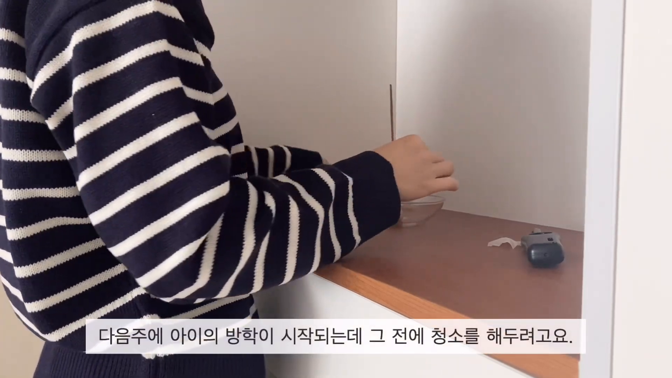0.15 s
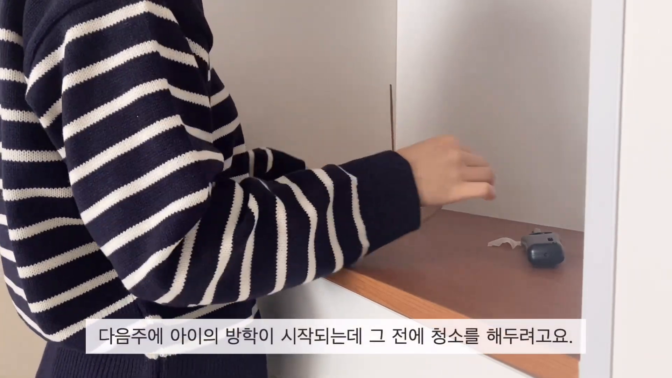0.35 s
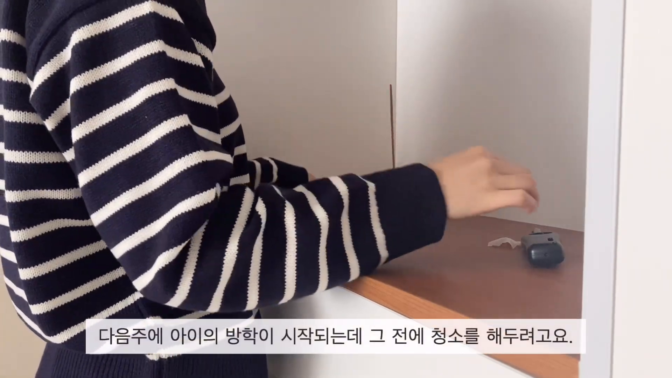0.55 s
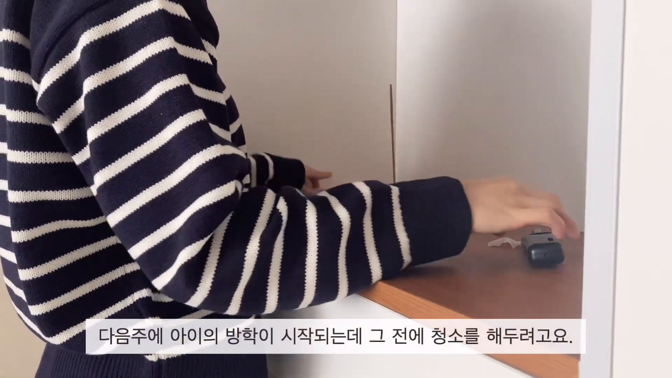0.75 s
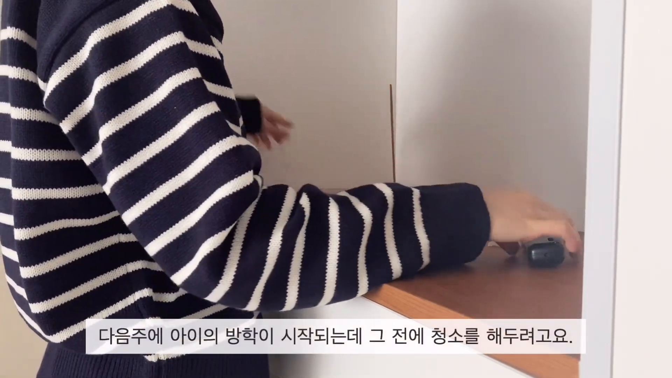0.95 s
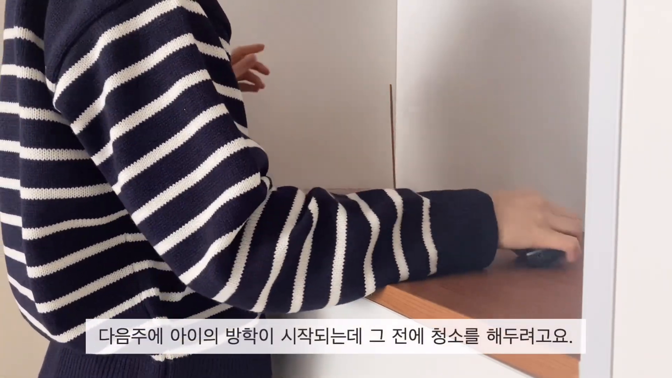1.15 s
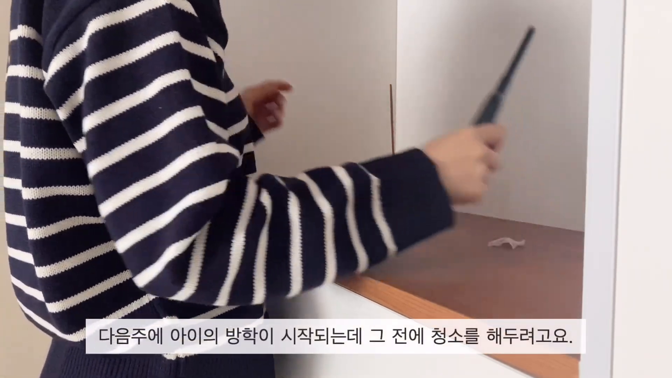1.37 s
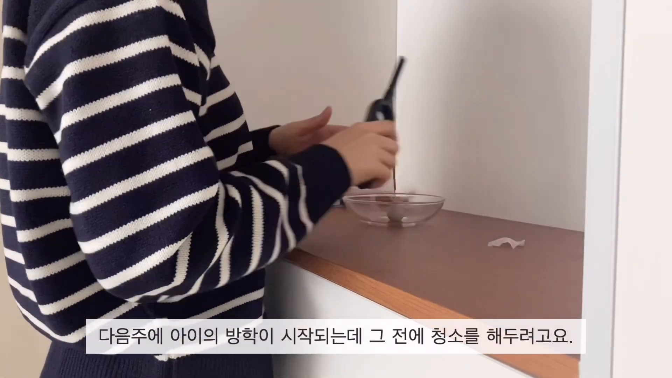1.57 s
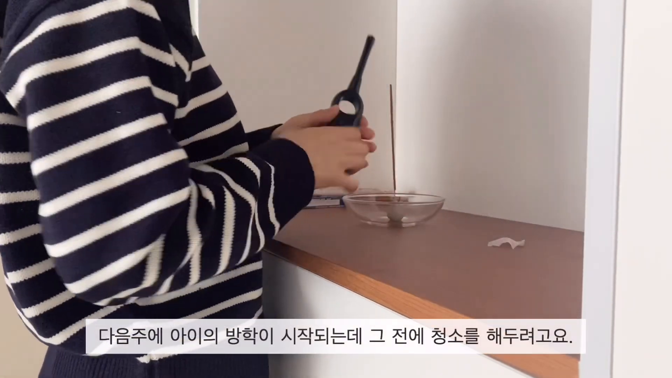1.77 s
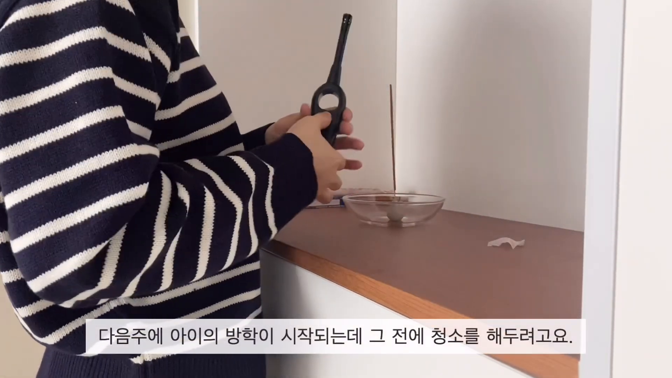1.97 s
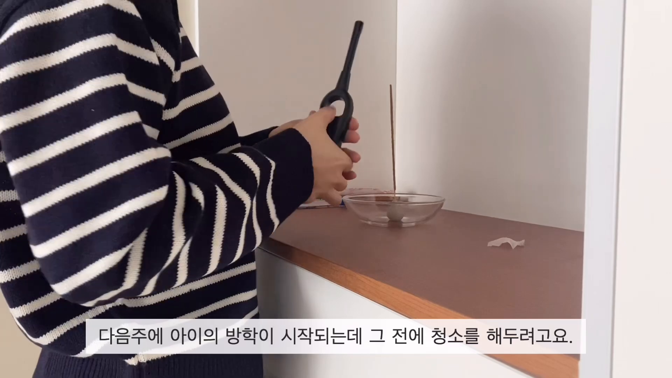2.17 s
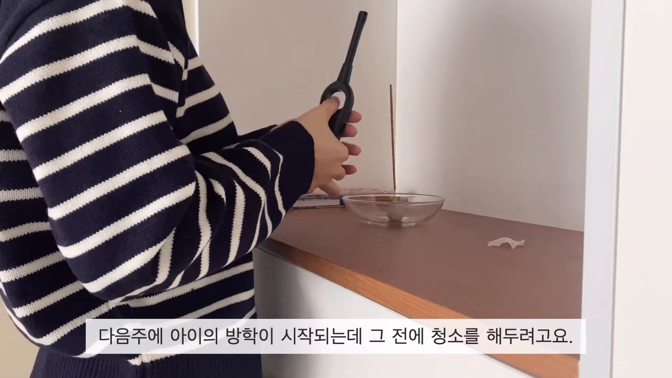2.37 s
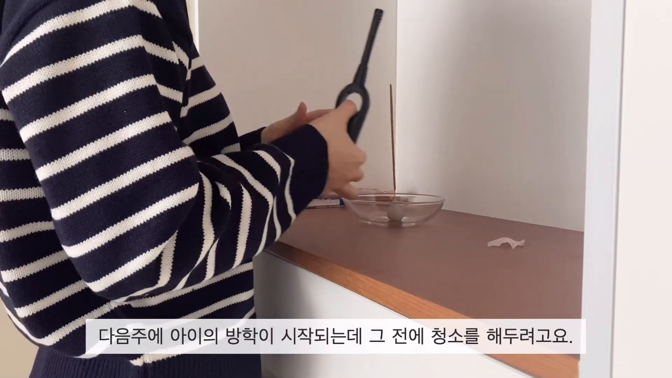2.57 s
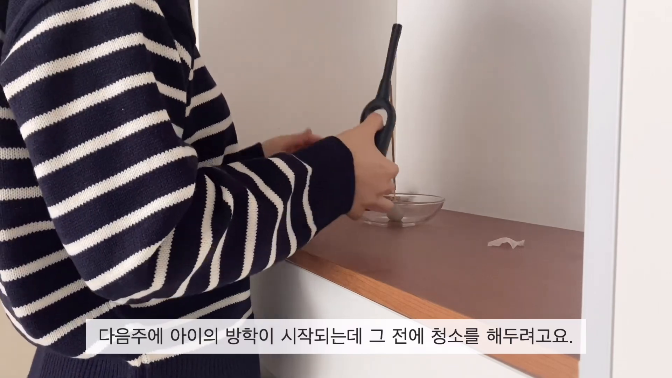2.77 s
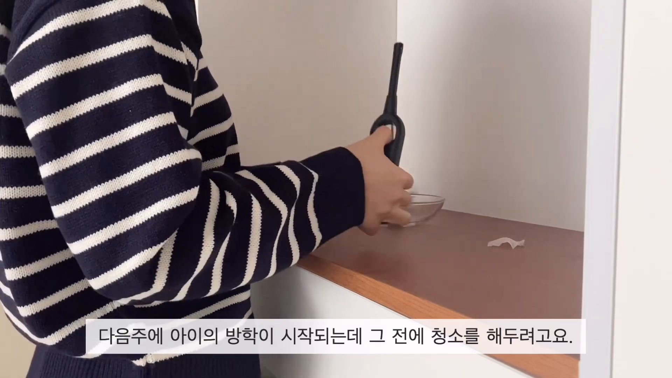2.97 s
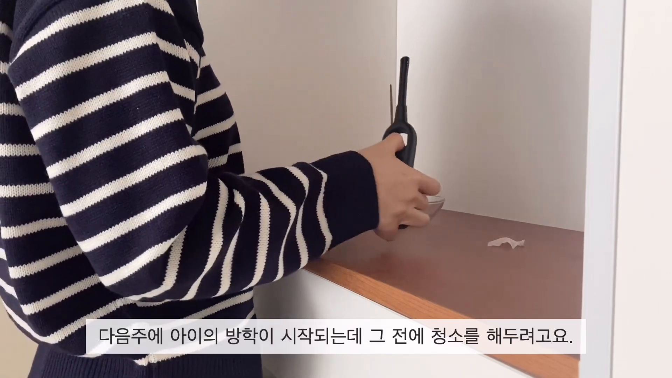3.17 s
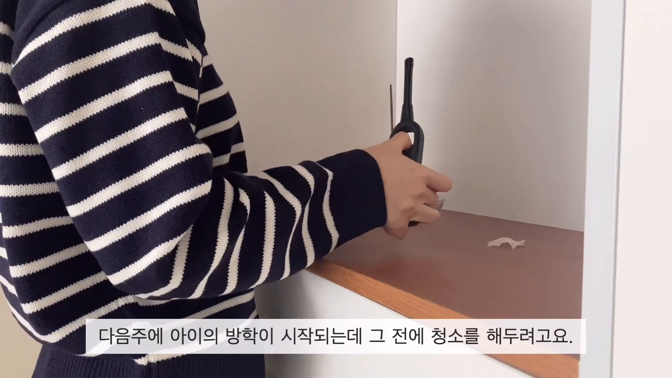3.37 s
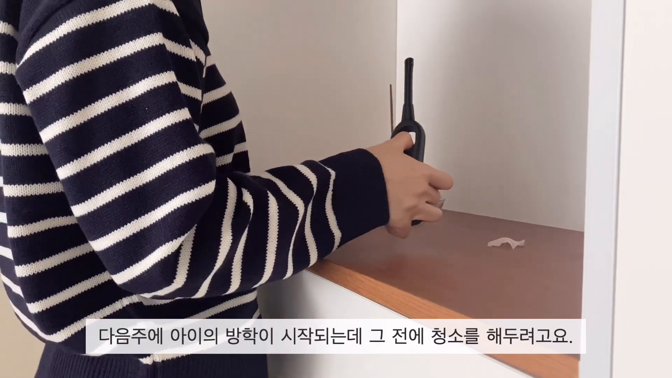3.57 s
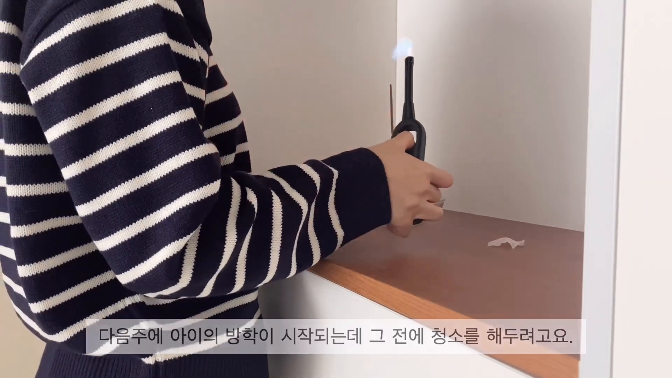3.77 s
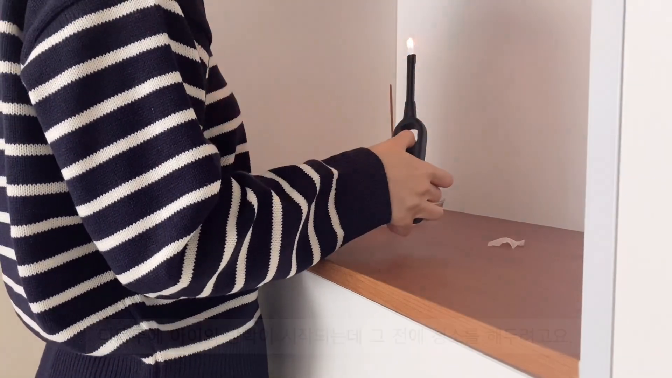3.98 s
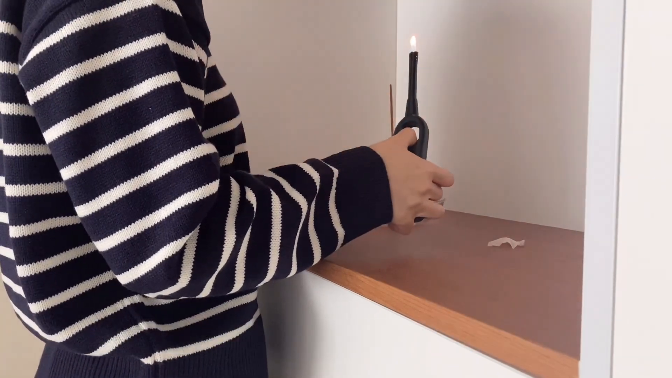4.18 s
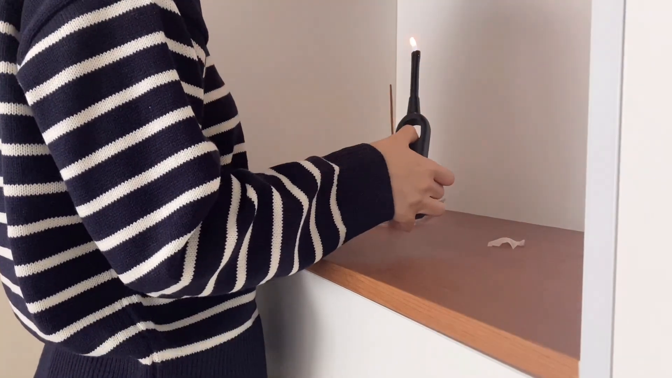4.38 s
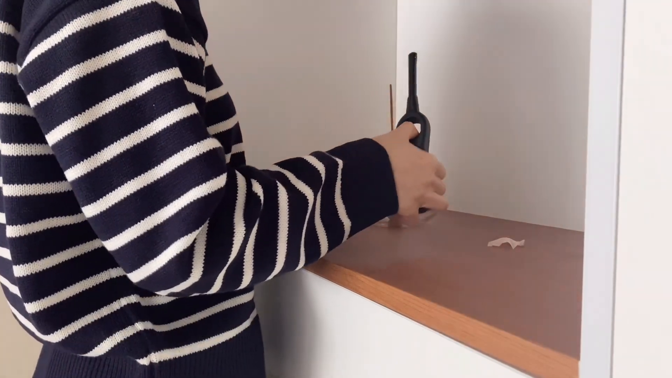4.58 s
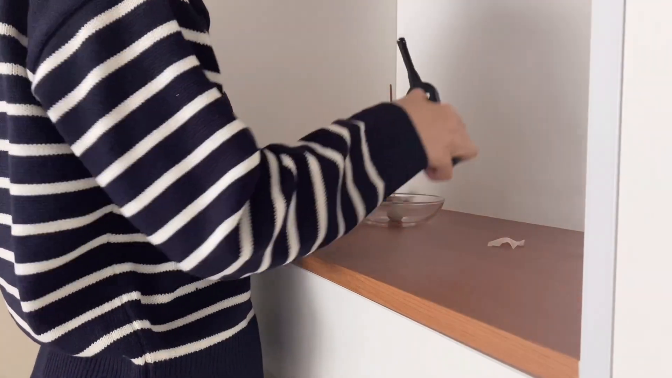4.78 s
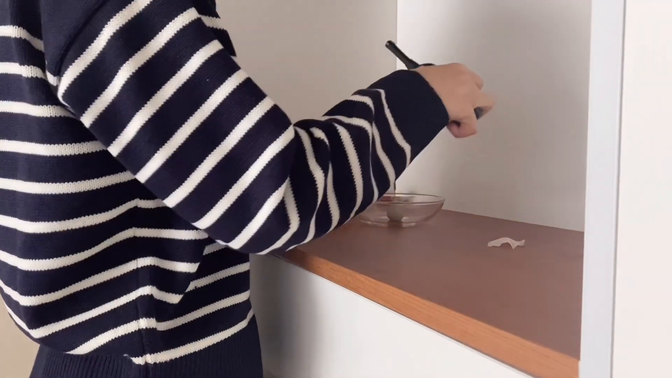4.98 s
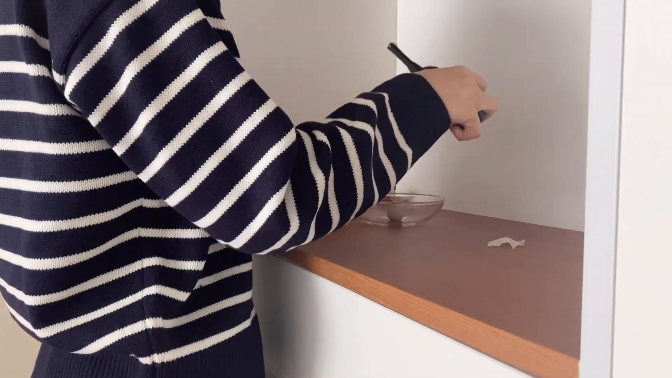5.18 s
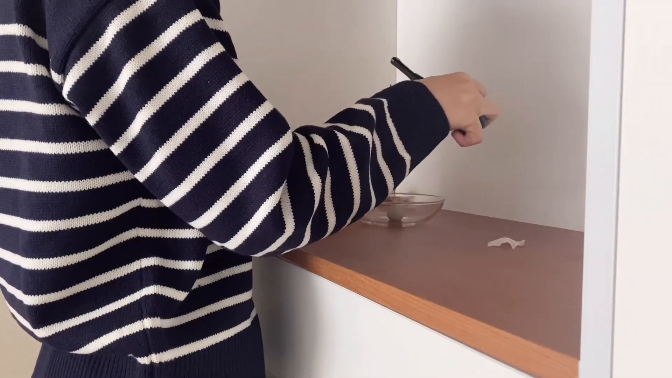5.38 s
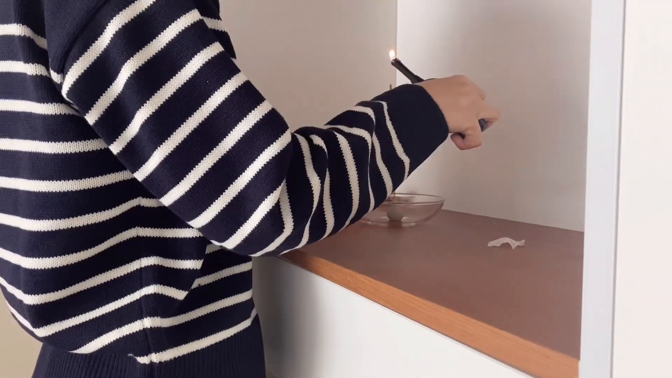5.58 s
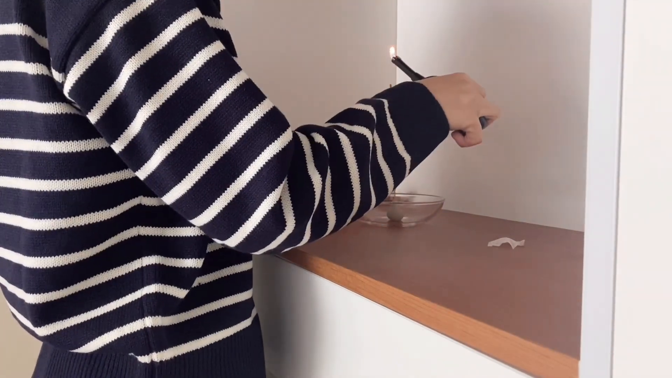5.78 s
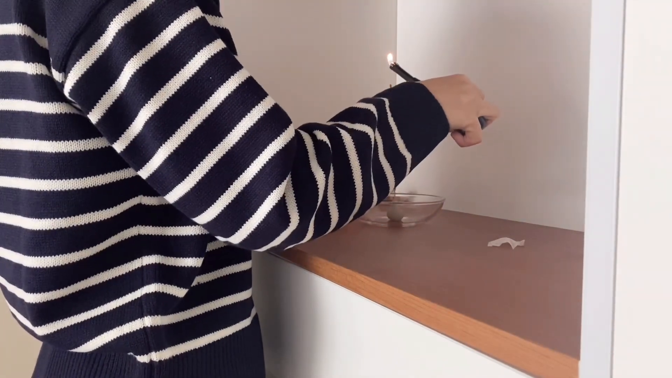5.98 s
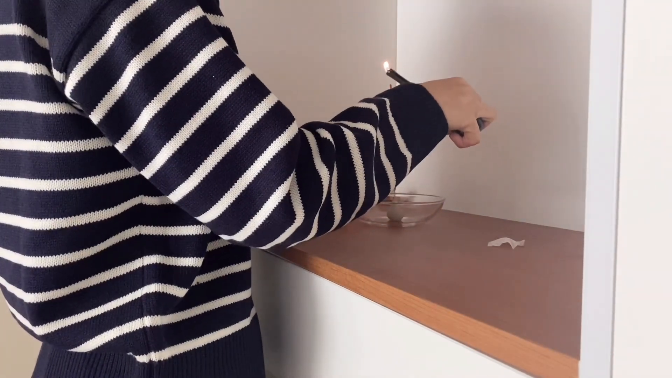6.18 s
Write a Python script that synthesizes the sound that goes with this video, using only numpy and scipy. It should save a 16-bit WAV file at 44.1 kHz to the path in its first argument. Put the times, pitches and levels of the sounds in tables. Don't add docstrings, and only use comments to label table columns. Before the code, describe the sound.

Thin stick ticks and grinds in its holder, then a plastic lighter slides off wood, its trigger creaking into two sharp snaps with soft gas puffs.

```python
import sys
import numpy as np
from scipy import signal
from scipy.fft import rfft, irfft
from scipy.io import wavfile
from scipy.ndimage import uniform_filter1d

SR = 44100
rng = np.random.default_rng(int(sys.argv[2]) if len(sys.argv) > 2 else 0)


def unload_wav(signal):
    wavfile.write(
        sys.argv[1],
        SR,
        np.round(np.clip(np.atleast_2d(signal).T, -1, 1) * 32767).astype(np.int16),
    )


def gain_from_db(level_db):
    decades = np.asarray(level_db, float) / 20
    return 10 ** decades


N = 275228


def colour(x, points):
    n = x.shape[-1]
    hz, db = np.transpose(points)
    log_hz = np.log(np.fft.rfftfreq(n, 1 / SR) + 1)
    return irfft(rfft(x) * gain_from_db(np.interp(log_hz, np.log(hz), db)), n)


def band(x, lo_hz, hi_hz):
    sos = signal.butter(2, [lo_hz, min(hi_hz, SR * 0.45)], "band", fs=SR, output="sos")
    return signal.sosfilt(sos, x)


def unit(x):
    return x / np.sqrt(np.mean(x ** 2))


def fade(t, t60):
    return np.exp(-np.log(1000) * t / t60)


def walk(rate_hz):
    hold = int(SR / rate_hz)
    steps = np.repeat(rng.standard_normal(N // hold + 1), hold)
    return unit(uniform_filter1d(uniform_filter1d(steps, hold), hold)[:N])


def curve(table):
    s, *columns = np.transpose(table)
    t = np.arange(N) / SR
    inside = (t >= s[0]) & (t <= s[-1])
    gate = uniform_filter1d(1.0 * inside, 800)
    return gate, [np.interp(t, s, column) for column in columns]


def add(out, s, sound):
    i = int(s * SR)
    out[:, i:i + sound.shape[-1]] += sound[..., :N - i]


# pitch in Hz, wander in Hz, level in dB
HUM = [(50.7, 1.5, -58), (207.5, 8.9, -74)]
# frequency in Hz, level in dB per Hz
AIR = [(44, -34), (75, -1.5), (86, -16.5), (211, -10.5), (264, -12.5), (301, -14), (395, -14.5), (505, -18),
       (540, -21.5), (774, -20.5), (1360, -36.5), (7630, -52), (16000, -68)]
# frequency in Hz, likeness from -1 to 1
AIR_ALIKE = [(40, 1), (130, 0.59), (300, 0.49), (650, -.3), (1500, -0.45), (6000, .1)]
AIR_DB = -60.5


def air():
    out = 0
    mid, side = colour(rng.standard_normal((2, N)), AIR)
    alike_hz, likeness = np.transpose(AIR_ALIKE)
    for hz in 35 * 2 ** np.arange(0, 9, 0.5):
        alike = np.clip(np.interp(np.log(hz), np.log(alike_hz), likeness), -0.99, 0.99)
        pair = np.sqrt(1 + alike) * mid + np.sqrt(1 - alike) * side * np.array([[1], [-1]])
        out = out + gain_from_db(1.2 * walk(6)) * band(pair, hz / 2 ** 0.22, hz * 2 ** 0.24)
    rumble_cut = signal.butter(4, 68, "high", fs=SR, output="sos")
    out = gain_from_db(AIR_DB) * unit(signal.sosfilt(rumble_cut, out))
    for hz, width, db in HUM:
        phase = 2 * np.pi * np.cumsum(hz + width * walk(6.6) / 2) / SR
        out = out + np.sqrt(2) * gain_from_db(db + 0.5 * walk(2.4)) * np.sin(phase)
    return out * gain_from_db(np.array([[-0.8], [0.8]]))


# band centre in Hz, t60 in seconds, level in dB
ROOM = [(250, .4, -7), (519.5, 0.37, 3), (1066, 0.45, 5), (1993, 0.56, 3.5), (3850, 0.39, 8),
        (7407, 0.27, 4), (14700, 0.14, -12.5)]
ROOM_DB, NICHE_DB, NICHE_T60_S = -2.5, 3, 0.064


def space(dry):
    t = np.arange(SR * 3 // 4) / SR
    noise = rng.standard_normal((3, len(t)))
    noise = 0.5 * noise[1:] + 0.37 * band(noise[0], 60, 2500) + 0.12 * noise[0]
    sparse = rng.random(len(t)) < 0.15
    niche = noise * sparse * (t > 0.001) * fade(t, NICHE_T60_S)
    tail = sum(gain_from_db(db) * band(noise, hz / 2.3, hz * 1.45) * fade(t, t60) for hz, t60, db in ROOM)
    tail = tail * (1 - np.exp(-t / 0.0013))
    echo = (gain_from_db(NICHE_DB) * unit(niche) + gain_from_db(ROOM_DB) * unit(tail)) / np.sqrt(len(t))
    return dry[0] + signal.fftconvolve(dry[1:], echo, axes=1)[:, :N]


def puffs(table, half_s):
    t = np.arange(N) / SR
    out = 0
    for s, db, hz in table:
        out = out + gain_from_db(db) * np.exp(-((t - s) / half_s) ** 2) * np.cos(2 * np.pi * hz * (t - s))
    return out


# middle in seconds, peak in dB, pitch in Hz
KNOCKS = [
    (1.022, -47, 72),
    (1.127, -48, 470),
    (1.129, -50, 244),
    (1.144, -46, 146),
    (1.155, -49.5, 410),
    (3.319, -49, 75),
    (4.468, -53, 760),
]


def knocks():
    return puffs(KNOCKS, half_s=0.006)


# middle in seconds, level in dB, half length in seconds, treble in dB
SCRAPES = [
    (0.037, -48.5, 0.02, -2),
    (0.116, -60, 0.024, -8),
    (0.197, -63.5, 0.022, -1.5),
    (0.364, -60.5, 0.016, 1),
    (0.392, -58, 0.014, -23),
    (0.52, -59, 0.054, -37),
    (0.618, -60.5, 0.0215, -9),
    (1.333, -74.5, 0.049, 7.5),
    (2.46, -77, 0.034, -14),
]
# frequency in Hz, level in dB
GRIND = [(250, -7), (550, -4), (900, -1), (1500, -2.5), (2300, -14), (3500, -36)]


def scrapes():
    t = np.arange(N) / SR
    grit = rng.standard_normal(N) * gain_from_db(4.5 * walk(500))
    low, high = unit(colour(grit, GRIND)), unit(band(grit, 1800, 20000))
    out = 0
    for s, db, half_s, treble_db in SCRAPES:
        out = out + gain_from_db(db) * np.exp(-((t - s) / half_s) ** 2) * (low + gain_from_db(treble_db) * high)
    return out


# time in seconds, level in dB
RUB = [
    [(0.0, -52), (0.062, -63.5), (0.16, -88), (0.376, -64.5), (0.522, -55), (0.578, -65), (0.622, -51),
     (0.7, -79), (0.76, -100)],
    [(1.0, -87), (1.066, -73), (1.248, -68), (1.386, -79), (1.882, -69.5), (2.194, -70), (2.328, -85),
     (2.6, -89)],
]


def rub():
    grains = rng.standard_normal(N) * gain_from_db(-1.0 * walk(300) + 4.3 * walk(55))
    low, high = unit(band(grains, 620, 3330)), unit(band(grains, 1600, 22300))
    pressure = sum(gate * gain_from_db(db - 5.0) for gate, (db,) in map(curve, RUB))
    return pressure * (low + gain_from_db(-1.5) * high)


# time in seconds, pitch in Hz, level in dB
SECOND_FOOT = [(.995, 10200, -92), (1.015, 11600, -79), (1.045, 13000, -91), (1.1, 12000, -90),
               (1.18, 11600, -78), (1.26, 10700, -80)]
SLIDE_S, SLIDE_LENGTH_S, SLOW_HZ, FAST_HZ, SQUEAL_DB = 0.96, 0.44, 6000, 11000, -81.5


def squeal():
    way = np.clip((np.arange(N) / SR - SLIDE_S) / SLIDE_LENGTH_S, 0, 1)
    speed = np.abs(np.sin(np.pi * way ** 0.9)) ** 0.4
    first_gate = np.minimum(speed / 0.82, 1) ** 2
    first_foot = first_gate, (SLOW_HZ + (FAST_HZ - SLOW_HZ) * speed, SQUEAL_DB)
    out = 0
    for gate, (hz, db) in (first_foot, curve(SECOND_FOOT)):
        level = gate * gain_from_db(db + 2.0 * walk(57.0))
        phase = 2 * np.pi * np.cumsum(hz * (1 + 0.0023 * walk(200))) / SR
        out = out + level * np.sin(phase)
    return out


# frequency in Hz, level in dB
BODY = [(500, -13.5), (1050, -3.5), (1300, -1), (1650, 4.5), (2200, 1.5), (2850, 2), (3300, -3),
        (4200, -16), (5500, -20.5)]
SHELL_HZ = (1600, 2950)
RATTLE_T60_S, CRACK_T60_S = 0.012, 0.008


def split_bands(x):
    return [unit(colour(x[0], BODY)), unit(band(x[1], 3400, 7000)), -unit(band(x[2], 7000, 17000))]


def clicks(table, ring_t60, rise, rattle_db, mid_db, top_db, sent_db, room_db=0.0, partner_db=-28.5, drag=1.0):
    out, t = np.zeros((2, N)), np.arange(1024) / SR
    swell = (1 - np.exp(-t / rise)) ** 2
    envelope = swell * fade(t, drag * np.array([[RATTLE_T60_S], [CRACK_T60_S], [CRACK_T60_S]]))
    impulse = np.tile(1.0 * (np.arange(len(t)) == 60), (3, 1))
    even = split_bands(impulse) * np.sqrt(np.mean(envelope ** 2, axis=1, keepdims=True))
    for s, peak_db, ring_hz, crack_db in table:
        mode_hz = SHELL_HZ[int(ring_hz < np.mean(SHELL_HZ))]
        partner_hz = mode_hz * (1 + 0.013 * rng.standard_normal())
        tone = np.sin(-2 * np.pi * ring_hz * t) + gain_from_db(partner_db) * np.sin(2 * np.pi * partner_hz * t)
        ring = swell * fade(t, ring_t60) * tone
        ring = ring / ring.max()
        shares = gain_from_db(np.array([rattle_db, crack_db + mid_db, crack_db + top_db]))
        grit = split_bands(rng.standard_normal((3, len(t)))) * envelope
        near = ring + shares @ grit
        sent = gain_from_db(sent_db) * ring * fade(t, 2 * ring_t60) + gain_from_db(room_db) * shares @ even
        add(out, s, gain_from_db(peak_db) * np.array([near, sent]))
    return out


# start in seconds, peak in dB, ring in Hz, crack in dB
TICKS = [(0.0364, -47.5, 2600, 11.5), (0.0464, -39, 4560, 2), (0.1061, -42, 4380, 7),
         (0.2319, -43, 3120, -7), (0.258, -42.5, 4530, -5.5), (0.3501, -45.5, 2860, -4),
         (0.387, -37.5, 4530, 1), (0.5322, -49.5, 2900, 5), (0.6126, -45.5, 4480, 5.5),
         (0.6519, -51.5, 2860, 1.5), (0.7242, -65, 5100, 7.5)]


def stick_ticks():
    return gain_from_db(-3) * clicks(TICKS, ring_t60=0.006, rise=0.00047, rattle_db=-4.5, mid_db=4.0, top_db=10.5, sent_db=-4)


# start in seconds, peak in dB, ring in Hz, crack in dB
GRIP = [(1.0489, -53.5, 1910, -9), (1.1248, -54, 1840, -13), (1.1727, -54.5, 1860, -10),
        (1.3694, -53.5, 1870, -6), (1.583, -60.5, 1740, -1), (1.6644, -45, 1630, -9),
        (1.6741, -38.5, 1870, -4.5), (2.0289, -36, 2140, -2), (2.17, -56, 1460, -19),
        (2.2432, -39, 2276, -5), (2.2545, -53.5, 1380, 2), (2.4094, -62.5, 3770, -17),
        (2.4666, -60, 2200, -16)]
# start in seconds, peak in dB, ring in Hz, crack in dB
PULL = [(2.6244, -49, 1890, -15), (2.6865, -51, 2060, -14), (2.7344, -43, 1600, -12),
        (2.7756, -51.5, 1800, -24), (2.8173, -46, 1750, -10.5), (2.8604, -44, 2250, -10.5),
        (2.8884, -50.5, 3080, -8), (2.9187, -46.5, 2350, -14.5), (2.9678, -43, 2260, -15),
        (3.0277, -43.5, 2700, -12), (3.0625, -43.5, 2640, -9), (3.0889, -47, 2450, -12.5),
        (3.1045, -43, 1580, -8.5), (3.1348, -43, 2230, -9), (3.1755, -40, 2550, -13.5),
        (3.2087, -45, 1710, -8), (3.248, -42, 1610, -17.5), (3.3303, -39, 2270, -7.5),
        (3.3618, -43, 2680, -7.5), (3.4314, -39, 2800, -5.5), (3.5423, -37.5, 1640, -7),
        (3.6529, -38, 2900, -5)]
# start in seconds, peak in dB, ring in Hz, crack in dB
LET_GO = [(4.0458, -31.5, 1510, -13), (4.0677, -42.5, 1640, -25), (4.0901, -42, 1570, -17),
          (4.1641, -31, 1570, -15.5), (4.2239, -31, 1660, -19.5), (4.2557, -34.5, 1600, -22),
          (4.291, -34, 1600, -16.5), (4.3133, -36.5, 1680, -18.5), (4.331, -37.5, 1565, -26.5),
          (4.4647, -35, 1710, -11), (4.4655, -41.5, 4950, -24.5), (4.6096, -35.5, 1608, -18.5)]
# start in seconds, peak in dB, ring in Hz, crack in dB
PULL_AGAIN = [(4.8378, -42, 2090, -14), (4.8783, -48, 1780, -12.5), (4.9045, -50.5, 2500, -17),
              (4.9941, -44, 1980, -7.5), (5.0265, -43, 2600, -6), (5.0613, -42.5, 2930, -4.5),
              (5.0853, -41.5, 2950, -7.5), (5.104, -43.5, 3010, -6.5), (5.122, -55.5, 2950, -14),
              (5.228, -40, 2340, -10), (5.3007, -39, 2880, -7.5), (5.4121, -39, 2460, -7)]


def trigger():
    held = dict(ring_t60=0.011, drag=1.9)
    pull = dict(rise=0.0013, mid_db=7.5, top_db=10, sent_db=0, room_db=-1.5, partner_db=-10.5, **held)
    grip = clicks(GRIP, rise=0.00097, rattle_db=-3.0, mid_db=5, top_db=-4.0, sent_db=2.5, room_db=0,
                  partner_db=-7, **held)
    first = clicks(PULL, rattle_db=3, **pull)
    let_go = clicks(LET_GO, rise=0.0014, rattle_db=-5.0, mid_db=6.5, top_db=10.5, sent_db=-2, room_db=-1,
                    partner_db=-44, **held)
    second = clicks(PULL_AGAIN, rattle_db=2.0, **pull)
    return gain_from_db(-0.5) * (grip + first + let_go + second)


# middle in seconds, peak in dB, pitch in Hz
CATCH = [(3.756, -43, 830), (3.757, -49.5, 490), (3.785, -43.5, 95), (3.804, -39, 182), (3.813, -45, 85),
         (5.459, -48.5, 664), (5.46, -42, 145), (5.461, -48, 414), (5.489, -42, 100), (5.49, -44, 213),
         (5.51, -41.5, 76)]


def gas_catch():
    return puffs(CATCH, half_s=0.0078)


# start in seconds, peak in dB, ring in Hz, crack in dB
HAMMER = [
    (3.7530, -7, 1800, -10),
    (5.4479, -13.5, 1950, -2),
]
# delay in seconds, peak in dB, ring in Hz, crack in dB
REBOUNDS = [
    (-.0020, -37.5, 2497, 2),
    (.0029, -17.5, 2400, 4.5),
    (.0058, -22.5, 3200, -2),
    (.0097, -20.5, 1539, -11),
]
SLACK = [0.88, 1.16]
ANVIL_HZ, ANVIL_DB, ANVIL_LATE_S = 3940, -26, 0.0065


def spark():
    bounces = []
    for blow, slack in zip(HAMMER, SLACK):
        for delay, db, hz, crack_db in REBOUNDS:
            bounces.append((blow[0] + delay * slack, db, hz * slack, crack_db))
    answers = [(blow[0] + ANVIL_LATE_S, ANVIL_DB, ANVIL_HZ, -8) for blow in HAMMER]
    snaps = clicks(bounces, ring_t60=0.0084, rise=0.00036, rattle_db=-3, mid_db=-2.5, top_db=5.5,
                   sent_db=-8, room_db=-12.5)
    anvil = clicks(answers, ring_t60=0.0063, rise=0.00053, rattle_db=-5.5, mid_db=-2.5, top_db=-1.5,
                   sent_db=10, room_db=4)
    blows = clicks(HAMMER, ring_t60=0.005, rise=0.00085, rattle_db=-8, mid_db=3.0, top_db=7.5,
                   sent_db=-16, room_db=4)
    return snaps + anvil + blows


def scene():
    near = scrapes() + rub() + squeal() + stick_ticks() + trigger() + spark()
    return air() + space(near) + knocks() + gas_catch()


def roll_off(x):
    return signal.sosfilt(signal.butter(12, 16870, fs=SR, output="sos"), x)


# frequency in Hz, level in dB
MIC = [(100, 0.5), (6000, -4), (8500, -5), (11000, 0), (12600, -6), (13300, -20), (14000, -3), (15000, 0),
       (15800, -7), (16100, -15), (16900, -39.5)]


def record(dry):
    late = np.array([dry[0], np.roll(dry[1], 1)])
    return roll_off(colour(late, MIC))


dry = scene()
out = record(dry)
unload_wav(out)
```